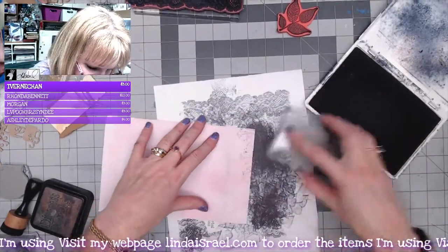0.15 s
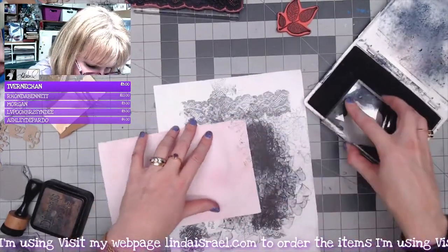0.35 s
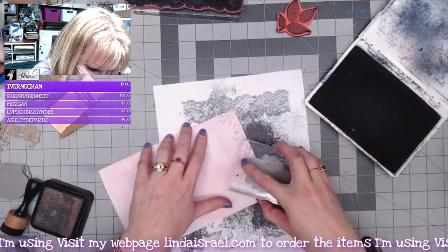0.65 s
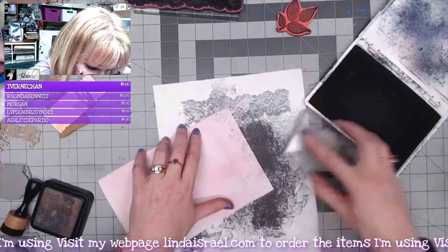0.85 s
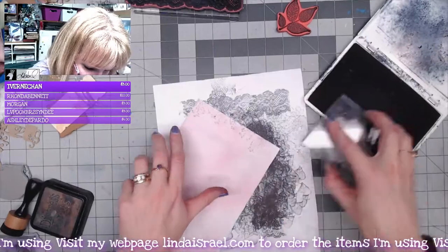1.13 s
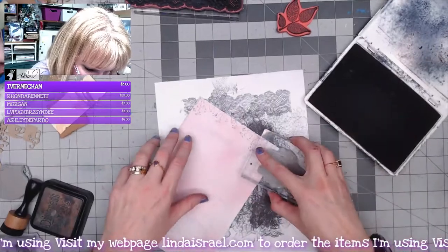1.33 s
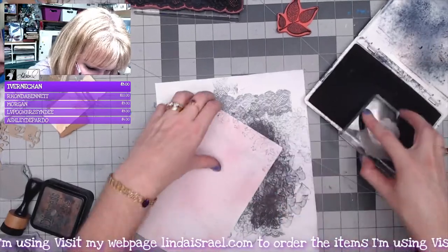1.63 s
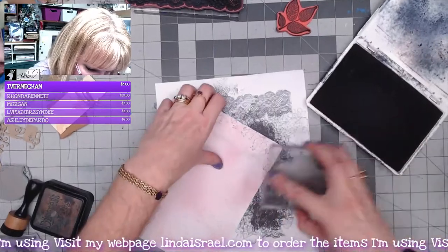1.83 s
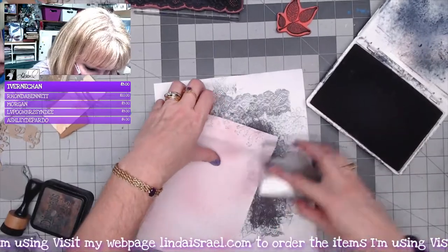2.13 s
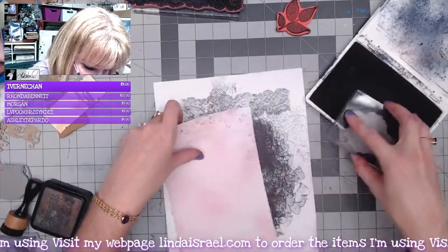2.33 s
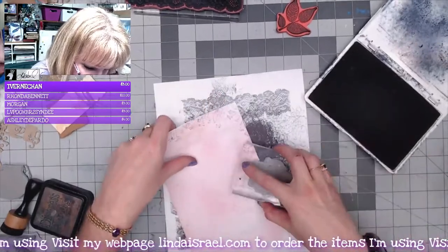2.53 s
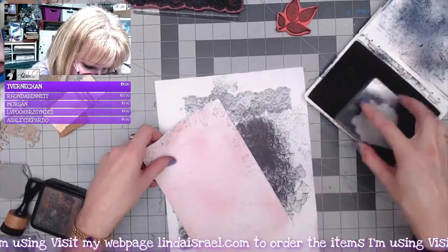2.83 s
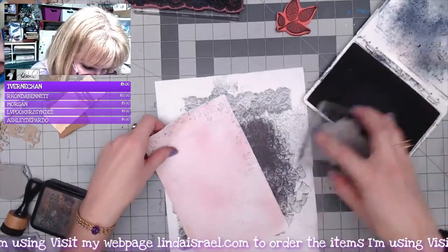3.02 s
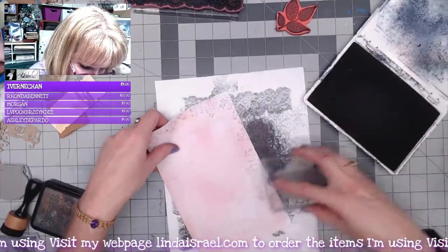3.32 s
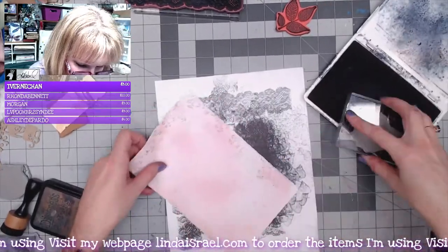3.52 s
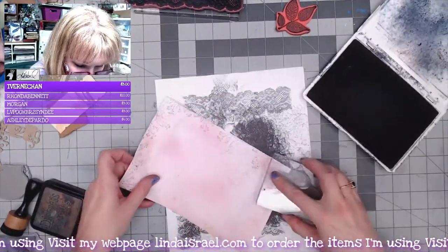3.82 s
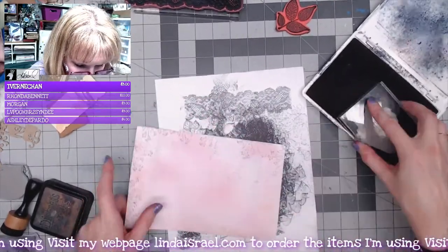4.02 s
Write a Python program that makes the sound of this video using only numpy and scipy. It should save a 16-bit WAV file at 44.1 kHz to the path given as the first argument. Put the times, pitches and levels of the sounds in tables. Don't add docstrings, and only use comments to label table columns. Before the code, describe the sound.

A stamp block knocks alternately on an ink pad and on paper over a desk, with sticky peeling ticks and faint paper rustle between.

```python
import sys
import numpy as np
from scipy import signal
from scipy.fft import rfft, irfft, next_fast_len
from scipy.io import wavfile
from scipy.ndimage import uniform_filter1d

SR = 44100
rng = np.random.default_rng(int(sys.argv[2]) if len(sys.argv) > 2 else 0)


def nominal_scale(level):
    x = np.asarray(level, float) / 20
    return 10 ** x


def inscribe(sig):
    pcm = np.round(np.clip(np.atleast_2d(sig).T, -1, 1) * 32767)
    wavfile.write(sys.argv[1], SR, pcm.astype(np.int16))


N = 183632

# f/Hz, level/dB per Hz
AIR_SPECTRUM = [(18, -60.5), (30, -43), (86, -6.5), (276, -9.5), (409, -7.5), (608, -15.5), (732, -15.5),
                (1030, -17.5), (12300, -43), (15200, -30), (16500, -31)]
# f/Hz, t60/s
ROOM_DECAY = [(100, 0.04), (300, 0.026), (1000, 0.18), (3000, 0.089), (8000, 0.087), (15000, 0.028)]

# t/s, low frame tone level/dB, upper frame tones level/dB, diffuse rumble level/dB, rumble t60/s
DESK_AFTERSOUNDS = [(0.183, -75.5, -69, -32, 0.18), (0.555, -82, -54, -37.5, .3),
                    (0.889, -86, -87, -32.5, 0.059), (1.231, -46.5, -49, -33, 0.26),
                    (1.568, -47, -66.5, -40, 0.28), (1.868, -57, -39, -34, 0.26),
                    (2.19, -76, -66, -23, 0.054), (2.478, -74, -27.5, -31.5, 0.27),
                    (2.801, -86, -71, -36.5, 0.14), (3.082, -77.5, -27.5, -28.5, 0.25),
                    (3.387, -55, -44.5, -36, 0.22), (3.67, -74.5, -32, -29, 0.23),
                    (3.942, -72.5, -51.5, -31, 0.098)]
# f/Hz, level/dB, t60/s
FRAME_LOW_MODES = [(233, -2.5, 1.2), (250, -13.5, 0.65)]
# f/Hz, level/dB, t60/s
FRAME_UPPER_MODES = [(549, -12, .6), (556, -14, .5), (797, -17, .5), (939, -7, .5), (948, -3, .7),
                     (957, -8, .5), (1179, -15, .45), (1419, -12, .4)]
# f/Hz, level/dB per Hz
RUMBLE_SPECTRUM = [(35, -37), (60, -1), (191, 2.5), (495, 1.5), (650, -2), (882, -0.5), (1520, -14.5),
                   (2290, -19.5), (2530, -22.5), (3500, -30), (4550, -58), (7700, -120)]

# t/s, level/dB, f/Hz
FINGER_SQUEAK = [
    (3.852, -63, 2106),
    (3.87, -64, 2105),
    (3.888, -62, 2024),
    (3.908, -54.5, 2080),
    (3.93, -66.5, 2020),
]

# start t/s, length t/s, hiss level/dB, change over the stroke level/dB, rasp against hiss level/dB
SHEET_STROKES = [(0.0, 0.064, -61.5, -7.5, -17.5), (0.112, 0.04, -68, 8, -18.5),
                 (0.403, 0.051, -72, -2.5, -20.5), (0.711, 0.0099, -56.5, -9, -16),
                 (0.79, 0.15, -51.5, -4, -30.5), (1.371, 0.0034, -56, 6.5, -34),
                 (1.935, 0.093, -62.5, 13, -12), (2.04, .11, -59, 9.5, -38), (2.169, 0.03, -47.5, 0, -23),
                 (2.545, .07, -55, 2, -9), (2.615, 0.0121, -55, -3.5, -10.5),
                 (2.643, 0.067, -54.5, -2, -36.5), (2.721, 0.024, -66.5, -3.5, -5.5),
                 (3.228, 0.17, -55, 1.5, -21), (3.303, 0.016, -55.5, -5, -21), (3.634, .008, -67.5, 2, -11),
                 (3.778, 0.07, -50.5, -2.5, -9.5), (3.878, 0.063, -72.5, 16.5, 6.5)]
# f/Hz, level/dB per Hz
HISS_SPECTRUM = [(1880, -40), (3200, -21), (4040, -8.5), (4600, -7.5), (5350, -1), (5850, -8.5),
                 (8360, -12.5), (12200, -21), (15000, -31), (15500, -31.5), (16500, -66)]
# f/Hz, level/dB per Hz
RASP_SPECTRUM = [(900, -32), (1500, -6.5), (2050, 7.5), (2900, 0.5), (3600, -23.5), (5000, -41.5)]

# start t/s, length t/s, pops level/dB, felt hiss level/dB
PAD_PULLS = [
    (0.259, .13, -48.5, -50.5),
    (0.947, 0.056, -43.5, -49),
    (1.658, 0.071, -49, -51.5),
    (2.253, 0.081, -44.5, -44),
    (2.88, 0.096, -48, -50.5),
    (3.477, 0.13, -46.5, -51.5),
    (4.02, 0.096, -52, -60.5),
]
# t/s, pop
# level/dB, pop f/Hz, snap level/dB
FELT_TICKS = [(0.25, -29, 1085, -32), (0.284, -45, 1330, -43), (0.292, -42, 1000, -35.5),
              (0.322, -51, 990, -45.5), (0.33, -58, 1000, -48), (0.353, -61, 990, -49.5),
              (0.946, -34, 1230, -30.5), (1.641, -27.5, 1110, -29), (1.678, -39, 872, -40.5),
              (1.709, -43, 900, -39.5), (2.162, -57, 996, -40), (2.168, -59.5, 1006, -30.5),
              (2.25, -30.5, 960, -41.5), (2.616, -49, 960, -36.5), (2.844, -47, 1120, -44.5),
              (2.867, -29.5, 1090, -32.5), (2.896, -39, 970, -39), (3.256, -55, 945, -43),
              (3.294, -66, 1010, -46), (3.433, -45, 1120, -47.5), (3.462, -30.5, 1120, -33.5),
              (3.483, -42, 1030, -46), (3.498, -61, 1120, -38), (3.513, -55, 1100, -41),
              (3.522, -36, 1050, -37), (3.562, -37, 1110, -40), (3.59, -44, 1070, -66.5),
              (3.61, -45.5, 1090, -67), (3.775, -64, 940, -39), (3.998, -33, 1090, -36),
              (4.045, -42, 1110, -52.5), (4.074, -42.5, 1086, -50.5)]
# t/s, level/dB, f/Hz
SMALL_POPS = [(0.305, -42, 990), (0.328, -49, 1040), (0.34, -56, 1060), (0.353, -48.5, 920),
              (0.362, -41.5, 1110), (0.37, -49.5, 1085), (0.382, -48, 966), (0.397, -51.5, 1080),
              (0.408, -63, 1046), (0.967, -45, 876), (0.997, -40, 1053), (1.015, -45.5, 1060),
              (1.698, -42.5, 1050), (1.73, -53, 1000), (1.681, -37, 1160), (1.711, -41, 1150),
              (1.754, -54, 940), (2.235, -35.5, 1130), (2.279, -34, 1060), (2.307, -51, 1130),
              (2.33, -63.5, 1024), (2.926, -39.5, 1150), (2.952, -50, 872), (2.96, -47.5, 1110),
              (3.503, -50.5, 1090), (3.54, -47, 1000), (3.582, -42, 1050), (4.066, -41.5, 1090),
              (4.094, -47, 1177), (4.117, -59, 1096)]
# f/Hz, level/dB per Hz
SNAP_SPECTRUM = [(880, -25.5), (1500, -3.5), (2300, -6.5), (3100, -10.5), (4050, 3.5), (5400, -3.5),
                 (7000, -8.5), (9030, -7), (14300, -30.5), (16500, -45)]

# t/s, case ring level/dB, desk thud level/dB, desk body level/dB, slap level/dB
PAD_LANDINGS = [
    (0.172, -0.5, -33, -16, -17),
    (0.881, -3.5, -45.5, -19.5, -19.5),
    (1.563, -3, -26.5, -16, -16.5),
    (2.183, -4, -30.5, -16.5, -17),
    (2.792, -2, -37, -19.5, -19.5),
    (3.379, -0.5, -24.5, -13.5, -18.5),
    (3.936, -5, -33.5, -20.5, -20),
]
# t/s, block ring level/dB, desk thud level/dB, desk body level/dB, slap level/dB
SHEET_LANDINGS = [
    (0.55, -8, -23, -17, -20),
    (1.2243, -21.5, -29.5, -23.5, -19.5),
    (1.865, -13, -28, -23, -17),
    (2.47, -5.5, -23, -18, -15),
    (3.074, -7.5, -22, -16, -13.5),
    (3.6671, -10.5, -25.5, -16.5, -15),
]
# t/s, ring level/dB, thud level/dB, body level/dB, slap level/dB
LIGHT_TOUCHES = [
    (0.246, -26, -34.5, -35, -48.5),
    (0.624, -29, -40.5, -34.5, -77),
    (1.301, -33, -37, -43.5, -62),
    (1.939, -36.5, -37, -37.5, -57),
    (2.166, -44.5, -54.5, -48, -42),
    (2.543, -24.5, -33.5, -38, -53.5),
    (3.0666, -38, -51, -51.5, -33),
    (3.1448, -22.5, -31.5, -27.5, -55),
    (3.741, -41.5, -64.5, -60, -72.5),
]
# t/s after the first touch, level/dB
PAD_ROCKING = [(.0022, -19), (.007, -20), (0.011, -25.5)]
# second touch t/s after the first, level/dB, third touch t/s, level/dB
SHEET_ROCKING = [
    (.004, -8, .014, -13),
    (.003, -5, 0.0071, -9.5),
    (.004, -12, .0105, -4.5),
    (.003, -9, 0.013, -6.5),
    (.009, -6.5, .015, -8),
    (.006, -7, 0.013, -5.5),
]
# t/s after the first, level/dB
REBOUND_ROCKING = [(.003, -1.4)]
# f/Hz, level/dB, t60/s
CASE_MODES = [(663.7, -4, 0.036), (872, 9, 0.017), (971, -19.5, 0.11), (1101, 9, 0.014), (1170, -13, 0.028),
              (2040, -22.5, 0.069)]
# f/Hz, level/dB, t60/s
BLOCK_MODES = [(676, -16, 0.064), (861.4, 3.5, 0.026), (932, -14, 0.051), (1085, 0.5, 0.017),
               (1094, 6.5, 0.013), (1880, -21, 0.063), (1460, -9, 0.0053)]
# f/Hz, level/dB, t60/s
PAD_THUD_MODES = [(143, -8, 0.1), (229, -2.5, 0.038), (287, 1, 0.036), (392.3, 2, 0.035)]
# f/Hz, level/dB, t60/s
PAD_BODY_MODES = [(441.2, -3.5, 0.035), (480, -4.5, 0.048), (525.4, -2.5, 0.039), (605.8, 2, 0.034)]
# f/Hz, level/dB, t60/s
MAT_THUD_MODES = [(149, -7.5, 0.084), (232, -6, 0.028), (294.4, 9, 0.029), (383, -11, 0.027)]
# f/Hz, level/dB, t60/s
MAT_BODY_MODES = [(429, -9, 0.059), (481.5, -6, 0.044), (523.8, -1, 0.048), (604, -3.5, 0.031),
                  (702, -10, 0.047)]
# f/Hz, level/dB per Hz
PAD_SLAP_SPECTRUM = [(760, -23), (1300, -15), (1540, -6.5), (2820, -15), (3140, -16.5), (4010, -15),
                     (4910, -8.5), (5940, -17.5), (6400, -16.5), (8090, -18.5), (13600, -31), (16500, -69)]
# f/Hz, level/dB per Hz
SHEET_SLAP_SPECTRUM = [(760, -19.5), (1500, -11.5), (2200, -8.5), (2900, -10.5), (3500, -13.5),
                       (5000, -7.5), (8000, -20.5), (13600, -31.5), (16500, -75.5)]

# f/Hz, level/dB
PORT_BALANCE = [(40, 1), (70, -9), (99, -10.5), (160, -10), (270, -5), (600, -2.8), (1220, -1.5),
                (2010, 2.8), (3330, 0)]
# f/Hz, phase/rad
PORT_LEAD = [(30, 1.0), (100, 0.2), (300, .15), (2300, 0.18), (3000, 0.55), (4100, 0.4), (4600, 0.13),
             (9000, .07), (13000, .14)]
# f/Hz, level/dB
MIC_RESPONSE = [(20, -15.5), (50, -12), (105, -2), (200, 3), (13000, -3), (15000, -5), (16300, -13),
                (17200, -76.5), (22000, -103.5)]


def read(points, hz):
    f, value = np.transpose(points)
    return np.interp(np.log(hz + 1), np.log(f + 1), value)


def evened(x):
    return x / np.sqrt(np.mean(x ** 2) + 1e-20)


def smooth(x, size):
    return uniform_filter1d(uniform_filter1d(x, size), size)


def add(mix, s, sound):
    part = mix[round(s * SR):][:len(sound)]
    part += sound[:len(part)]


def colour(spectrum, size=2048):
    log_gain = np.log(nominal_scale(read(spectrum, abs(np.fft.fftfreq(size, 1 / SR)))) + 1e-5)
    taps = np.fft.ifft(np.exp(np.conj(signal.hilbert(log_gain)))).real
    return taps / np.linalg.norm(taps)


def ring(modes, spread_db, rise_s=.0012, damping=1, size=6000):
    t = np.arange(size) / SR
    luck = rng.standard_normal((len(modes), 2))
    x = np.zeros(size)
    for (hz, db, t60), (share, detune) in zip(modes, luck):
        decay = nominal_scale(db + spread_db * share - 60 * damping * t / t60)
        x += decay * np.sin(2 * np.pi * hz * (1 + .003 * detune) * t)
    x = x * (1 - np.exp(-t / rise_s))
    return x / abs(x).max()


def stroke(start, length, level_db, change_db, rise, fall, size=32):
    t = np.arange(0, N, size) / SR - start
    held = np.clip(t, 0, length)
    db = level_db + change_db * held / max(length, 1e-3)
    db = db + rise * np.minimum(t, 0) - fall * np.maximum(t - length, 0)
    return np.repeat(nominal_scale(db), size)[:N]


def quiet_air():
    noise = rng.standard_normal((3, N))
    sides = noise[:1] + 0.41 * noise[1:]
    return nominal_scale(-76) * signal.oaconvolve(sides, colour(AIR_SPECTRUM, size=4096)[None], axes=1)[:, :N]


def room(x):
    taps = np.zeros((3, SR // 2))
    at = np.arange(200, SR // 2 - 20, 20) + rng.integers(0, 20, (3, (SR // 2 - 201) // 20))
    np.put_along_axis(taps, at, rng.choice([-1., 1.], at.shape), 1)
    sides = taps[:1] + 0.22 * taps[1:]
    hz, t, z = signal.stft(sides, SR, nperseg=256)
    tail = signal.istft(z * nominal_scale(-60 * t / read(ROOM_DECAY, hz)[:, None]), SR, nperseg=256)[1]
    return signal.fftconvolve(x[None], tail / np.linalg.norm(tail[0]), axes=1)[:, :N]


def desk_rumble(level_db, t60):
    t = np.arange(16000) / SR
    noise = signal.oaconvolve(rng.standard_normal(len(t)), colour(RUMBLE_SPECTRUM))[:len(t)]
    deep = smooth(noise, 60)
    bass_db = -40 * t / t60 - 25 * (t / (0.64 * t60)) ** 4
    fade_db = -40 * t / t60 - 25 * (t / t60) ** 4
    tail = nominal_scale(bass_db) * deep + nominal_scale(fade_db) * (noise - deep)
    return nominal_scale(level_db) * tail * (1 - np.exp(-t / 0.002))


def desk():
    rumble, hum = np.zeros(N), np.zeros(N)
    for s, low_db, upper_db, rumble_db, t60 in DESK_AFTERSOUNDS:
        low = nominal_scale(low_db - 3.5) * ring(FRAME_LOW_MODES, 1.5, 0.011, size=30000)
        upper = nominal_scale(upper_db - 13) * ring(FRAME_UPPER_MODES, 2.2, rise_s=.07, size=30000)
        add(hum, s, low + upper)
        add(rumble, s, desk_rumble(rumble_db, t60))
    waver = evened(smooth(rng.standard_normal(N), 900))
    return rumble + hum * nominal_scale(3.5 * waver - 4)


def squeak():
    s, db, hz = np.transpose(FINGER_SQUEAK)
    t, out = np.arange(s[0], s[-1], 1 / SR), np.zeros(N)
    phase = 2 * np.pi * np.cumsum(np.interp(t, s, hz)) / SR
    fuzz = smooth(rng.standard_normal((2, len(t))), 170)
    tone = (1 + .6 * evened(fuzz[0])) * np.sin(phase)
    tone = tone + .12 * evened(fuzz[1]) * np.sin(1.5 * phase)
    add(out, s[0], tone * nominal_scale(np.interp(t, s, db) + 6.5) * signal.windows.tukey(len(t), .3))
    return out


def rustle():
    hiss, rasp = np.zeros(N), np.zeros(N)
    quick = 5001
    for s, length, db, change_db, rasp_db in SHEET_STROKES:
        turned = stroke(s, length, db, change_db, rise=697.5, fall=455)
        hiss += turned
        rasp += nominal_scale(rasp_db) * turned
    for s, *_, slap_db in SHEET_LANDINGS:
        settling = stroke(s + 0.023, 0, slap_db, 0, quick, fall=356.5)
        hiss += nominal_scale(-40) * settling
        rasp += nominal_scale(-44) * settling
    for (blow_s, *_), (s, length, _, db) in zip(PAD_LANDINGS, PAD_PULLS):
        press_s = blow_s + 0.02
        press = stroke(press_s, s - press_s, db, 0, quick, quick)
        hiss += nominal_scale(-3.5) * press + stroke(s, length, db, -100.5 * length, quick, fall=448.5)
        rasp += nominal_scale(-5) * press + stroke(s, length, db - 6, -150 * length, quick, fall=448.5)
    drag = smooth(rng.standard_normal(N), 500)
    return np.array([hiss, rasp]) * nominal_scale(0.93 * evened(drag))


def sheet(x):
    t = np.arange(3000) / SR
    modes = rng.standard_normal(len(t)) * nominal_scale(-60 * t / .04)
    modes = nominal_scale(-6) * modes / np.linalg.norm(modes)
    modes[0] = 1
    z = signal.stft(signal.oaconvolve(x, modes / np.linalg.norm(modes))[:N], nperseg=256)[2]
    patches = uniform_filter1d(rng.standard_normal(z.shape), size=6, axis=0)
    patches = evened(uniform_filter1d(patches, size=10, axis=1))
    return signal.istft(z * nominal_scale(2.2 * patches), nperseg=256)[1][:N]


def slide():
    crackle = (rng.random(N) < 350 / SR) * nominal_scale(1.4 * np.minimum(rng.exponential(1, N), 5))
    crackle = signal.lfilter([1], [1, -.97], crackle)
    flutter = nominal_scale(0.26 * evened(uniform_filter1d(rng.standard_normal(N), 300)))
    gain = rustle()
    grain = rng.standard_normal((2, N)) * (flutter + .5 * crackle) * gain
    hiss = nominal_scale(0.4) * sheet(signal.oaconvolve(grain[0], colour(HISS_SPECTRUM))[:N])
    dull = signal.lfilter(*signal.butter(2, 6500, fs=SR), hiss)
    brightness = np.sqrt(np.minimum(gain[0] / nominal_scale(-53.5), 1))
    rasp = nominal_scale(-1.0) * signal.oaconvolve(grain[1], colour(RASP_SPECTRUM))[:N]
    return dull + brightness * (hiss - dull) + rasp


def pop(hz, cycles):
    u = np.arange(int(cycles * SR / hz)) * hz / SR / cycles
    return np.sin(np.pi * u ** 0.72) ** 2 * np.sin(2 * np.pi * cycles * u)


def snap():
    decay = nominal_scale(np.linspace(0, -90, 1100)) + nominal_scale(np.linspace(-9, -25, 1100))
    return np.convolve(rng.standard_normal(1100) * decay, colour(SNAP_SPECTRUM))


def peel():
    pops, pull = np.zeros(N), np.zeros(N)
    for hz in np.linspace(920, 1240, 9):
        size = (rng.random(N) < 40 / SR) * nominal_scale(2.0 * np.minimum(rng.exponential(1, N), 4))
        pops += signal.oaconvolve(size, pop(hz, 7))[:N]
    for s, length, db, _ in PAD_PULLS:
        pull += stroke(s, length, db, -31 * length, rise=5001, fall=712)
    out = nominal_scale(-4.5) * pull * evened(pops)
    for s, db, hz in SMALL_POPS:
        add(out, s - .001, nominal_scale(db) * pop(hz, 8.2))
    for s, pop_db, hz, snap_db in FELT_TICKS:
        tick = pop(hz, 7.5)
        tick = tick + 0.19 * pop(.8 * hz, 6.5)[:len(tick)]
        add(out, s - .001, nominal_scale(pop_db + 1.5) * tick)
        add(out, s, nominal_scale(snap_db - 2.0) * snap())
    return out


def contacts(touches, way=1):
    x, luck = np.zeros(1500), rng.standard_normal((len(touches), 2))
    s, db = np.transpose(touches)
    at = np.clip((s + .0002 * luck[:, 0]) * SR, 1, 1499).astype(int)
    x[at] = way * nominal_scale(db + 0.66 * luck[:, 1])
    x[0] = 1
    return x


def blow(parts, ring_db, thud_db, body_db, slap_db, touches, rise_s, crack, damping, face):
    top, thud, body = parts
    spread_db = 1.2
    x = nominal_scale(ring_db - 2.5) * ring(top, spread_db, rise_s, damping)
    x = x + nominal_scale(thud_db + 7.5) * ring(thud, spread_db, 0.0041, damping)
    x = x + nominal_scale(body_db + 4.0) * ring(body, spread_db, 0.0045, damping)
    x = np.convolve(x, touches)
    t = np.arange(6000) / SR
    decay = nominal_scale(-60 * damping * t / 0.017) + nominal_scale(-8.5 - 60 * damping * t / 0.1)
    puff = rng.standard_normal(6000) * decay
    puff[0] = crack
    add(x, .0004, nominal_scale(slap_db + 1.0) * np.convolve(puff, colour(face)))
    return x


def air_rush(face):
    rush = rng.standard_normal(600) * nominal_scale(np.linspace(-70, 0, 600))
    return np.convolve(signal.lfilter([.4], [1, -.6], rush), colour(face))


def stamping():
    out = np.zeros(N)
    pad = CASE_MODES, PAD_THUD_MODES, PAD_BODY_MODES
    mat = BLOCK_MODES, MAT_THUD_MODES, MAT_BODY_MODES
    for s, *levels_db in PAD_LANDINGS:
        touches = contacts(PAD_ROCKING)
        add(out, s + 0.0003, blow(pad, *levels_db, touches, rise_s=.004, crack=3.2, damping=1,
                                  face=PAD_SLAP_SPECTRUM))
        add(out, s - 600 / SR, nominal_scale(levels_db[-1] - 6.5) * air_rush(PAD_SLAP_SPECTRUM))
    for (s, *levels_db), rock in zip(SHEET_LANDINGS, SHEET_ROCKING):
        touches = contacts(np.reshape(rock, (2, 2)))
        add(out, s + 0.0003, -blow(mat, *levels_db, touches, rise_s=0.0066, crack=6.4, damping=1,
                                   face=SHEET_SLAP_SPECTRUM))
        add(out, s - 600 / SR, nominal_scale(levels_db[-1] - 1) * air_rush(SHEET_SLAP_SPECTRUM))
    for s, *levels_db in LIGHT_TOUCHES:
        touches = contacts(REBOUND_ROCKING, way=-0.83)
        add(out, s - .0006, blow(mat, *levels_db, touches, rise_s=0.0024, crack=6.8, damping=2.4,
                                 face=PAD_SLAP_SPECTRUM))
    return out


def scene():
    hits = stamping()
    near = hits + desk() + peel() + slide() + squeak()
    return near + nominal_scale(-25) * room(hits) + quiet_air()


def roll_off(x):
    return signal.sosfilt(signal.butter(12, 16640, fs=SR, output="sos"), x)


def record(dry):
    limited = 1.204 * np.tanh(dry / 1.55)
    heard = signal.oaconvolve(limited, nominal_scale(-0.64) * colour(MIC_RESPONSE, size=4096)[None], axes=1)[:, :N]
    size = next_fast_len(N + 4096)
    hz = np.fft.rfftfreq(size, 1 / SR)
    half = nominal_scale(read(PORT_BALANCE, hz) / 2) * np.exp(.5j * read(PORT_LEAD, hz))
    mix = irfft(rfft(heard, size) * np.array([half, 1 / half]), size)[:, :N]
    return roll_off(mix)


dry = scene()
out = record(dry)
inscribe(out)
```